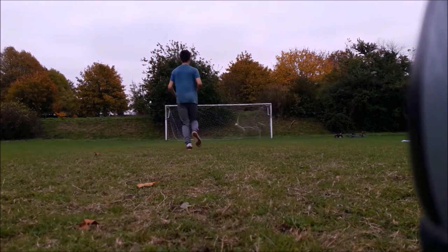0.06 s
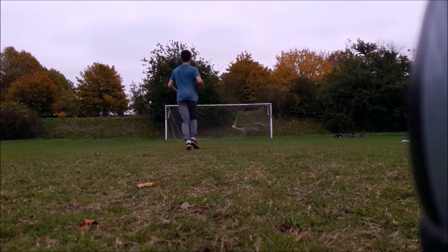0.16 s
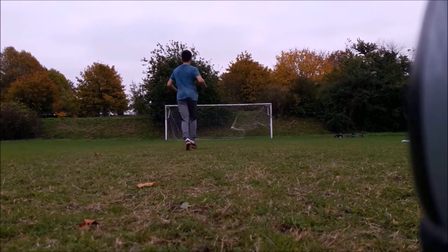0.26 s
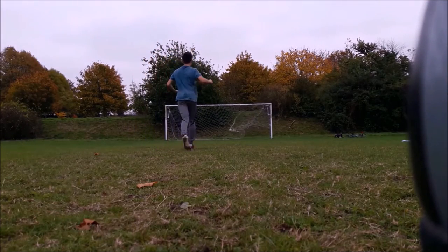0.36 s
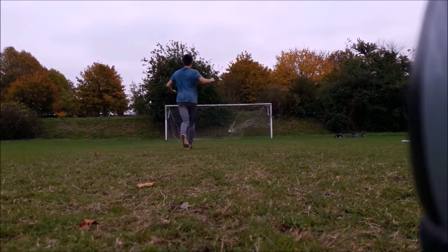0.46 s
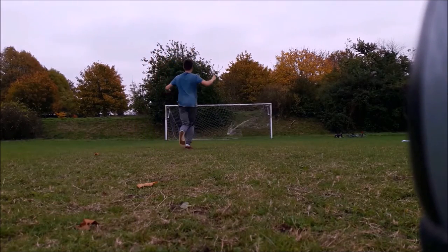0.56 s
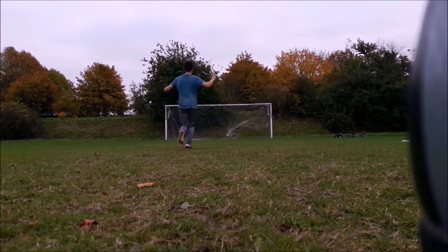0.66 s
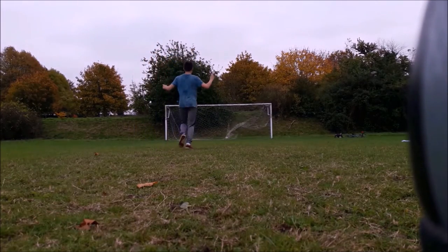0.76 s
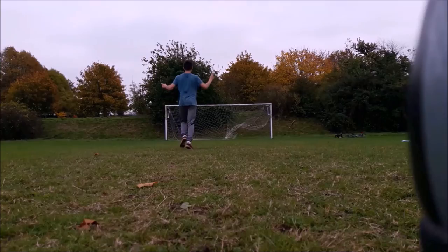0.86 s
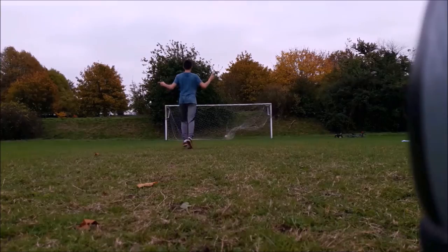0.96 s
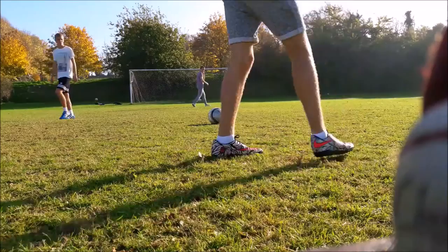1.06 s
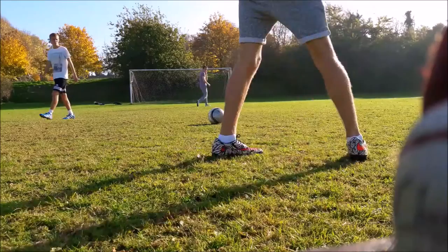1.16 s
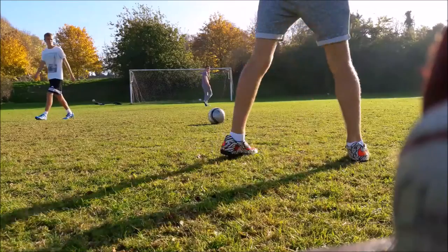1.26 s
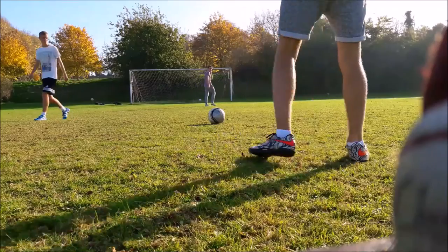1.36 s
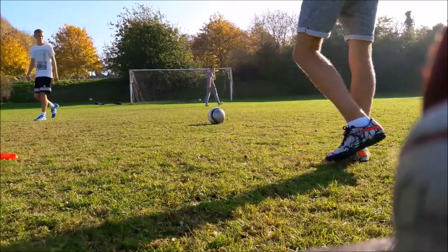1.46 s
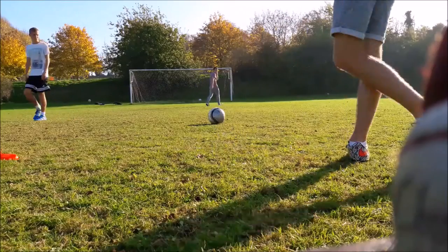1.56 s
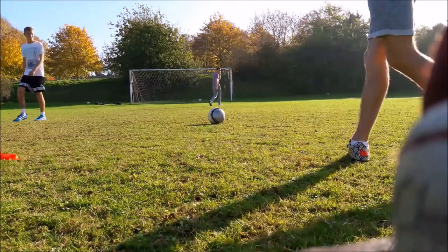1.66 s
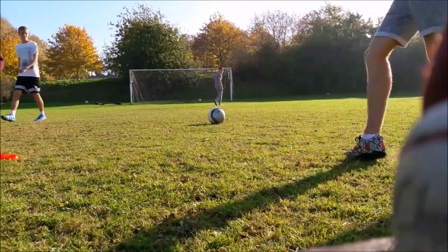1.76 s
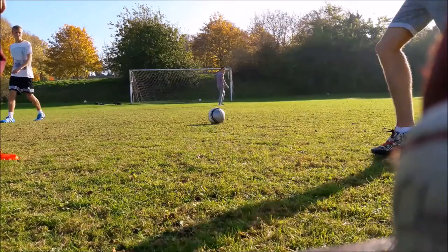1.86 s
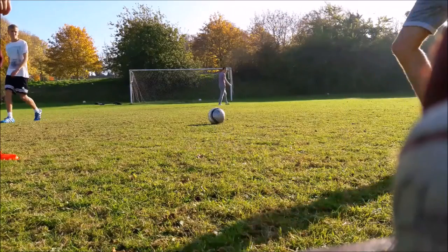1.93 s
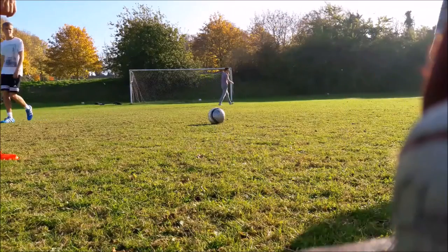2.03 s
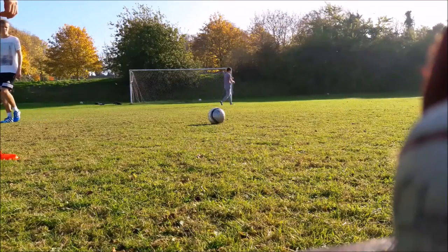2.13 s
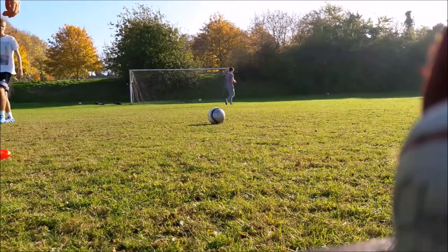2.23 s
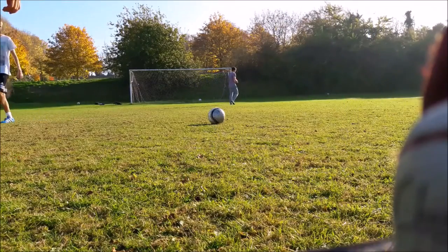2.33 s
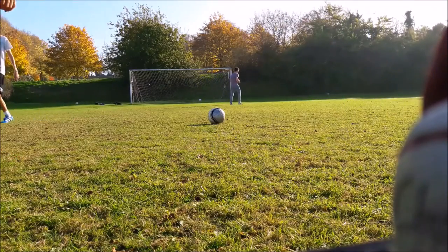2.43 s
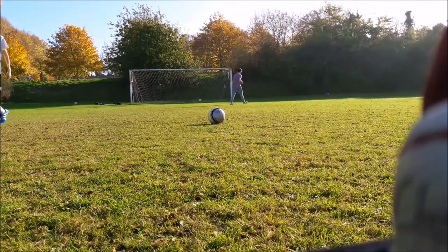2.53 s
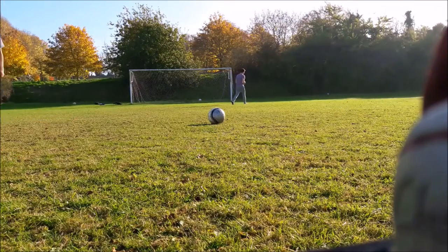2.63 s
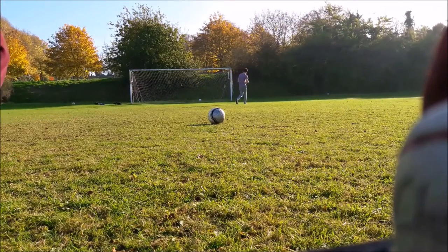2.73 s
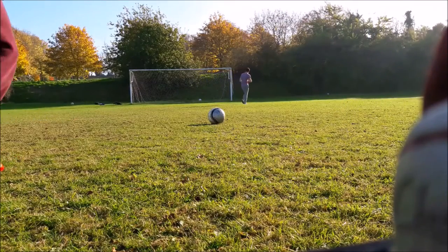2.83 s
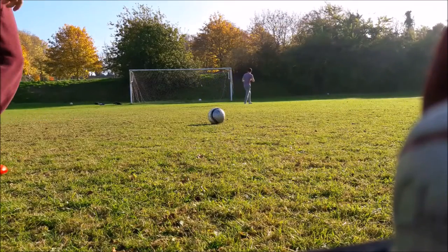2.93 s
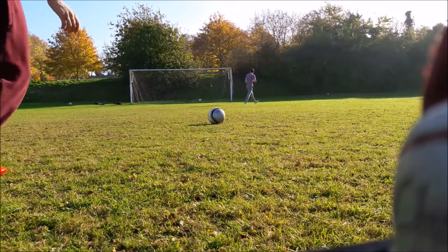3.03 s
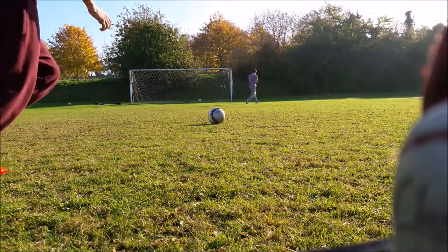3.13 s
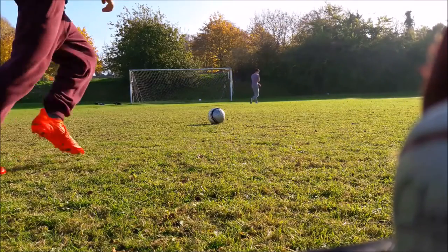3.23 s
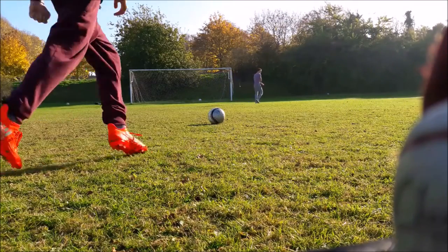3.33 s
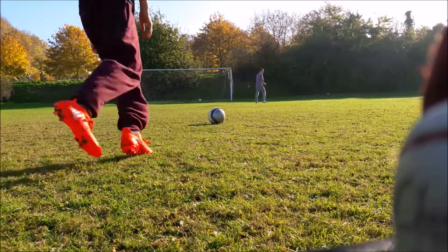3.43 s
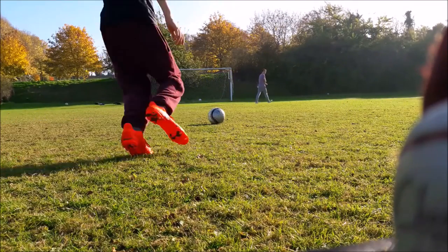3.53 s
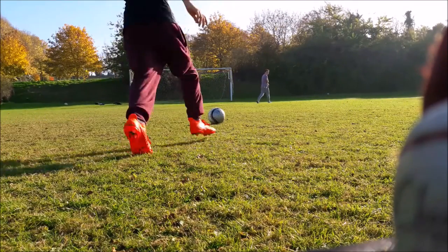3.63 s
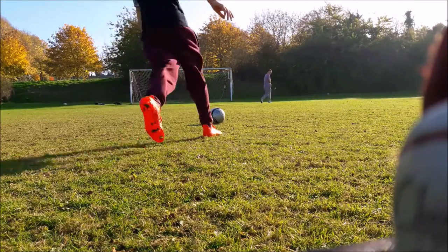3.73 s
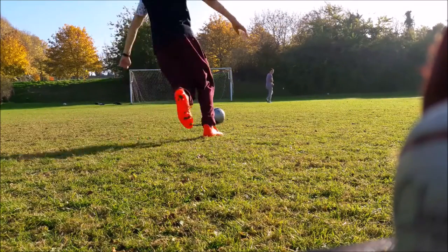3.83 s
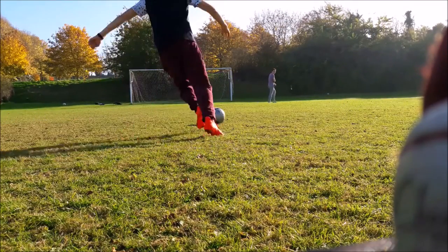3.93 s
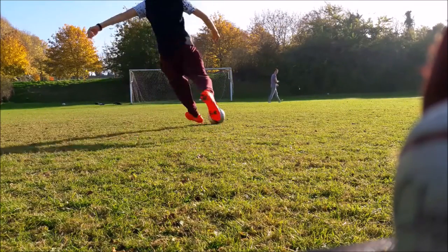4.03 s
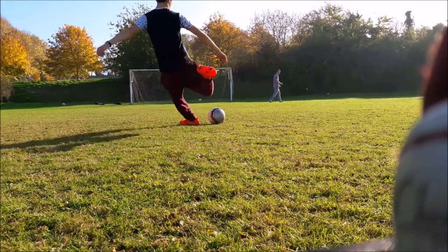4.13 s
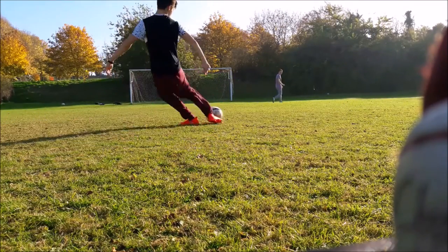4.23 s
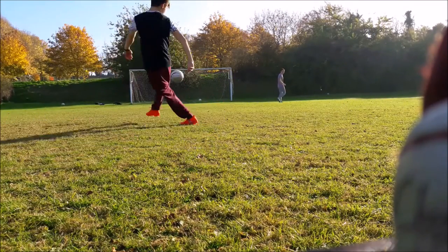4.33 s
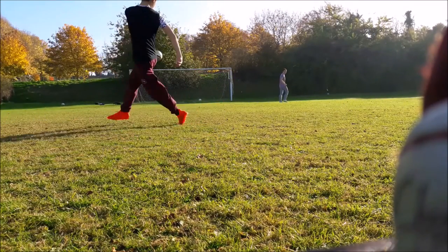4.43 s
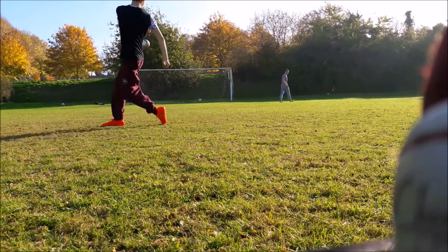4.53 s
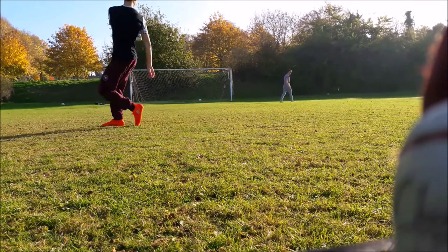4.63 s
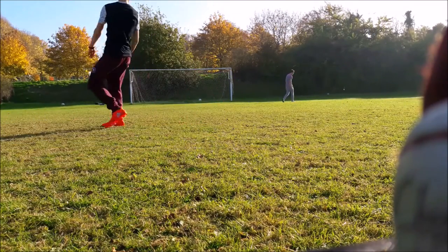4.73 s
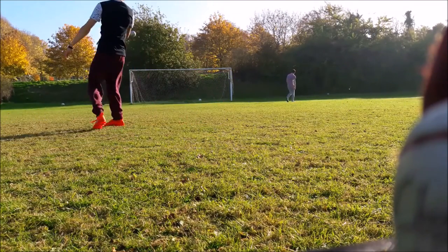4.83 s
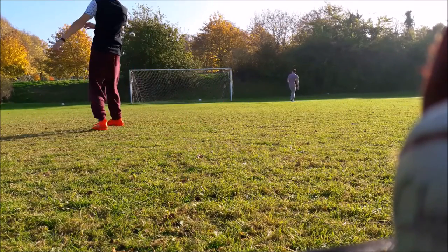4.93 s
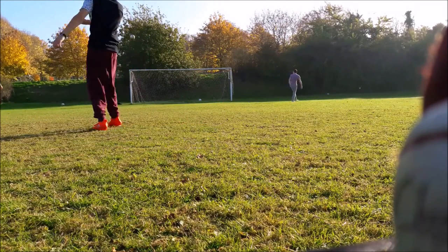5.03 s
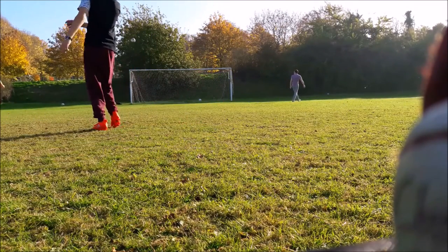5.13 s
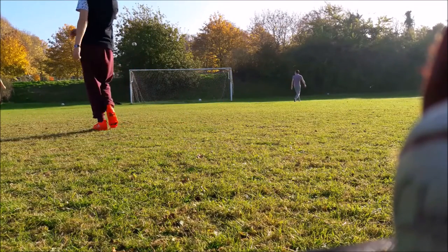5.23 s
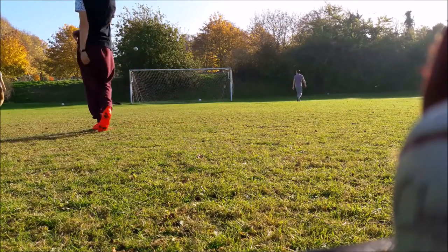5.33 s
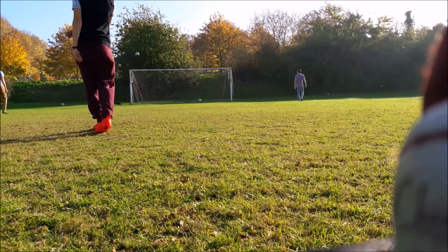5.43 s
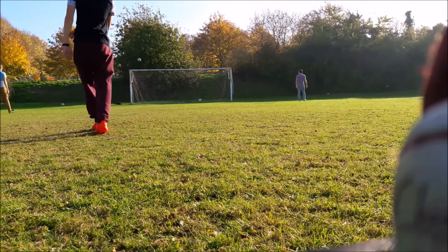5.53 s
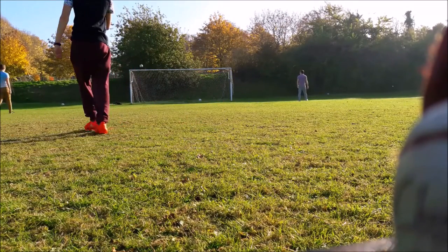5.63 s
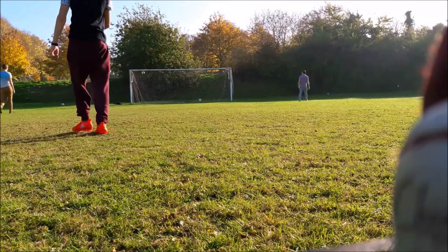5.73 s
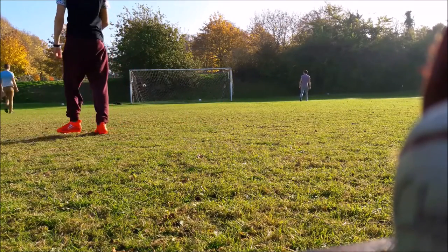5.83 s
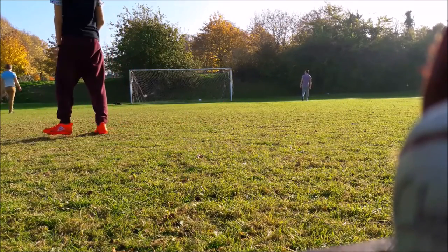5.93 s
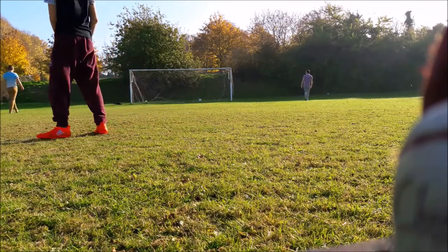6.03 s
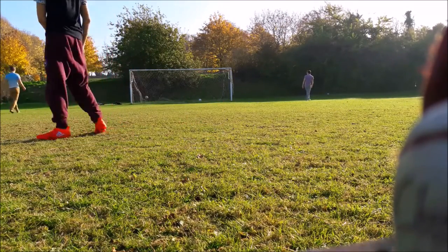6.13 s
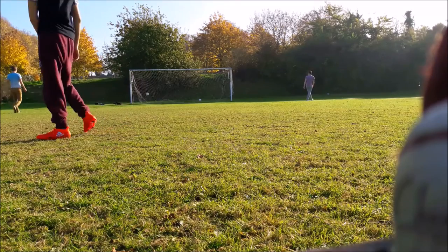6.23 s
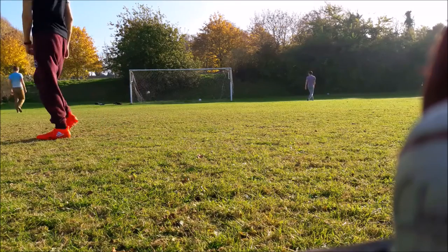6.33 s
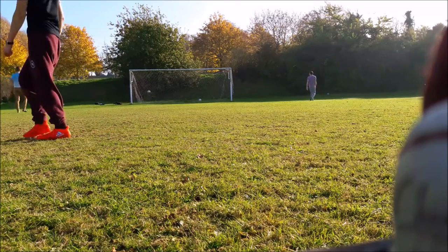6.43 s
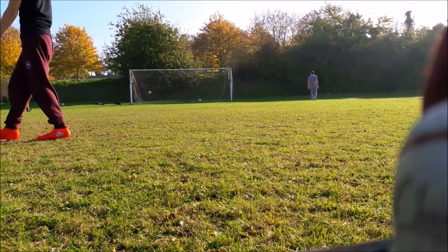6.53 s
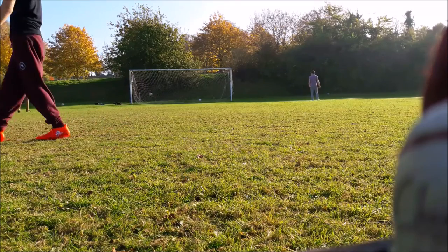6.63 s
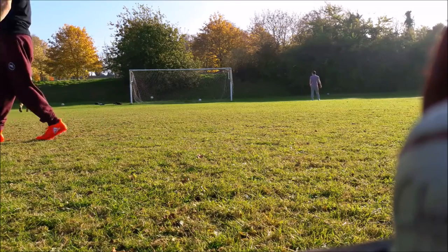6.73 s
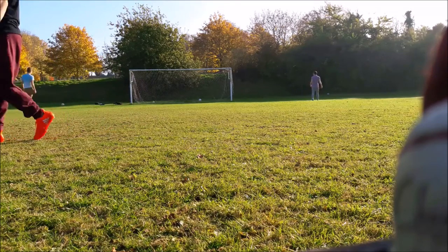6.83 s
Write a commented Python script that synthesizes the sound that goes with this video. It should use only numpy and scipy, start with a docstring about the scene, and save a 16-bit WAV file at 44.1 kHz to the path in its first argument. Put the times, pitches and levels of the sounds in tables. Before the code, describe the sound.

On an open grass pitch, light wind touches the microphone and a far goal frame rattles faintly. The sound changes abruptly to a propeller plane droning overhead, with soft footsteps crunching the grass. A small bird gives three faint whistles during a short run-up. A boot strikes the football with a sharp, loud thud, and a moment later the ball crashes more quietly into a wire fence, leaving loose wires ticking.

```python
"""A grass football pitch in two shots, on a stereo microphone. First, light wind buffets the microphone
and a far goal frame rattles. After the cut at 1.1 s a propeller plane drones overhead while players walk
and run, brushing and snapping the grass. From 3.6 s a small bird whistles three times. At 4.35 s a boot
strikes the ball hard, ringing its skin and the air inside; at 5.9 s the ball crashes into the wire fence
behind the goal, and loose wires tick."""
import sys
import numpy as np
from scipy import signal
from scipy.fft import rfft, irfft, next_fast_len
from scipy.io import wavfile
from scipy.ndimage import uniform_filter1d

SR = 44100
rng = np.random.default_rng(int(sys.argv[2]) if len(sys.argv) > 2 else 0)


def to_wav(s):
    """Save 16-bit WAV."""
    ch = np.atleast_2d(s).T  # columns
    pcm = np.round(np.clip(ch, -1, 1) * 32767)  # PCM
    wavfile.write(sys.argv[1], SR, pcm.astype(np.int16))


N = 303408
CUT_S, HOP = 1.107, 128
HZ, T = np.fft.rfftfreq(4 * HOP, 1 / SR), np.arange(N // HOP + 4) * HOP / SR  # noise bins and frames

# The ball's skin under the boot. Each row: pitch in Hz, level in dB, t60 in seconds.
SKIN_MODES = [(301.5, -4, 0.039), (522, -8, 0.022), (684, 4.5, 0.017), (884, -5, 0.018),
              (1100, -12.5, 0.027), (1285, -6.5, 0.021), (1730, -16.5, 0.027)]
# The boot's first slap. Each row: frequency in Hz, level in dB.
SLAP_SPECTRUM = [(1180, -31), (2000, -16), (2750, -11), (4460, 3.5), (5800, -6), (7620, -8), (8550, -14),
                 (9340, -4), (12600, -11), (16400, -16)]
# Air inside the flying ball. Each row: pitch in Hz, level in dB, t60 in seconds, beat in Hz.
CAVITY_MODES = [(1690, -73, 0.22, 21), (2153, -61, 0.53, 30), (2780, -59.5, .9, 2.5),
                (3451, -58.5, 0.61, 8.7), (4060, -50, 0.17, 14), (4640, -49, .15, 15), (5200, -60, .1, 10)]
def kick(start_s=4.3519, contact_s=.0132, squash_hz=110, free_t60=.022):
    """The boot rings the skin as it lands and lets go, squashes the ball and leaves its air ringing."""
    out, t = np.zeros(N), np.arange(round(.06 * SR)) / SR
    skin = -amp(-11) * uniform_filter1d(ring(SKIN_MODES, .1), size=8, mode="constant")
    add(out, start_s, skin)
    release = signal.convolve(skin, signal.windows.hann(41) / 20)  # letting go is slower
    add(out, start_s + contact_s - .0005, amp(-9.5) * release)
    # the squash lasts while the boot presses and dies fast once the ball is free
    held = (1 - np.exp(-t / .00046)) * amp(-60 * np.maximum(t - contact_s - .003, 0) / free_t60)
    add(out, start_s, amp(-13.5) * held * np.cos(2 * np.pi * squash_hz * (t - .0008)))
    slap_gain = amp(at_hz(SLAP_SPECTRUM, np.fft.rfftfreq(len(t), 1 / SR)))
    slap = irfft(rfft(rng.standard_normal(len(t))) * slap_gain, len(t))
    add(out, start_s, amp(-22) * evened(slap) * amp(-60 * t / .0079))
    # the spinning ball is not quite round, so each air mode is a close pair that beats
    pairs = [(hz + side * beat / 2, db - 4.5, t60)
             for hz, db, t60, beat in CAVITY_MODES for side in (-1, 1)]
    cavity = ring(pairs, .5)
    add(out, start_s + contact_s, cavity * (1 - np.exp(-np.arange(len(cavity)) / SR / .011)))
    return out


# Wire mesh behind the goal. Each row: pitch in Hz, level in dB, t60 in seconds.
MESH_MODES = [(522, -4, 0.06), (756, -2, 0.04), (920, -7, 0.1), (1720, 0, 0.09), (2030, -2, .09),
              (2420, -3, .09), (2915, -1, 0.17), (2990, 2, 0.19), (3530, 1.5, 0.05), (4720, 2, .075),
              (7030, -1.5, .04), (8750, -10, 0.05), (9560, 1, .022), (11920, -4, .025)]
# Blows on the mesh. Each row: start in seconds, relative level in dB, tilt in dB per octave.
MESH_BLOWS = [(5.908, -41.5, 1.5), (5.922, -49, -5), (5.9404, -45, -5), (5.9568, -38, 0),
              (5.9714, -50, -8.5), (5.9844, -39.5, -4), (6.0114, -45, -4), (6.0294, -52, -8.5)]
def fence(impact_s=5.9093, width_s=.00027, detune=.004):
    """The ball hits the fence; each blow rings another part of the mesh, glancing ones more dully."""
    out = np.zeros(N)
    push = amp(-26) * np.exp(-.5 * (np.arange(-80, 81) / SR / width_s) ** 2)
    add(out, impact_s - 80 / SR, -push)  # the ball flattens
    add(out, impact_s - 80 / SR + .014, push)  # and springs off
    for s, db, tilt in MESH_BLOWS:
        draws = rng.standard_normal((len(MESH_MODES), 2))
        modes = [(hz * (1 + detune * shift), mode_db + 1.5 * boost + tilt * np.log2(hz / 3000), t60)
                 for (hz, mode_db, t60), (boost, shift) in zip(MESH_MODES, draws)]
        add(out, s, amp(db - 10.5) * ring(modes, .2))
    return out


# The loudest ticks in the fence. Each row: start in seconds, level in dB.
WIRE_TICKS = [(6.0207, -38), (6.0304, -43), (6.059, -26), (6.069, -34), (6.0764, -39), (6.0922, -34),
              (6.1274, -42), (6.1334, -37), (6.1454, -40), (6.149, -26), (6.1624, -44)]
# One loose wire. Each row: pitch in Hz, level in dB, t60 in seconds.
WIRE_MODES = [(7930, -1, .015), (9300, -6, .012)]
def loose_wires(tick_hz=8200):
    """Loose wires tick after the crash and ring briefly, with small ticks scattered between."""
    small = zip(rng.uniform(6, 6.18, size=10), rng.normal(-49, 3, size=10))
    ticks = blips([(s, db, tick_hz) for s, db in [*WIRE_TICKS, *small]], cycles=1.05)
    return ticks + amp(-30) * signal.oaconvolve(ticks, ring(WIRE_MODES, .03))[:N]


# Noise around the kick and the crash. Each row: start in seconds, level in dB, low and high edge in Hz,
# rise and t60 in seconds.
NOISE_SPRAYS = [(4.325, -61, 1000, 5000, .02, .5), (4.352, -47, 3000, 7000, 0.0009, 0.058),
                (4.354, -34.5, 700, 2190, 0.00207, 0.11), (4.362, -38, 280, 1100, .006, .22),
                (4.369, -55.5, 3200, 6000, .008, 0.3), (4.51, -60.5, 3000, 6600, 0.02, 0.44),
                (5.908, -40.5, 400, 1100, 0.0022, 0.76), (5.909, -43, 1101, 5450, 0.0018, 0.96),
                (5.91, -54, 5940, 11000, .001, 0.53), (5.955, -46, 400, 3570, 0.003, 0.59),
                (5.96, -45, 480, 1000, .01, .8), (6.02, -55.5, 6460, 10500, 0.023, 0.69),
                (6.15, -59.5, 3820, 5660, 0.034, 1.0)]
def sprays():
    """Noise power of the boot swishing through grass, the kick's tail, the shaken mesh and its echo."""
    power = 0
    for s, db, lo_hz, hi_hz, rise, t60 in NOISE_SPRAYS:
        since = np.maximum(T - s, 0)
        band = shape([(lo_hz * .7, -25), (lo_hz, 0), (hi_hz, -4), (hi_hz * 1.3, -30)])
        power += (band * (1 - np.exp(-since / rise)) * amp(db - 60 * since / t60)) ** 2
    return power


# Snaps and thuds around the pitch. Each row: start in seconds, level in dB, pitch in Hz.
STALK_SNAPS = [(1.02, -56, 2600), (1.37, -44.5, 1840), (1.429, -52, 2500), (1.516, -50, 2688),
               (1.555, -41, 899), (1.569, -43, 1380), (1.695, -51, 5500), (1.757, -45, 901.5),
               (1.82, -47, 1420), (1.874, -44, 1517), (1.939, -45, 1033), (2.05, -46, 3900),
               (2.205, -45, 1113), (2.324, -55, 700), (2.59, -50, 1599), (3.2, -52, 2997),
               (3.481, -39, 1500), (3.532, -40.5, 1200), (3.549, -37.5, 1900), (3.59, -53, 1902),
               (3.967, -47, 1600), (3.998, -49, 1298), (4.011, -47.5, 3996), (4.072, -47, 1800),
               (4.088, -44.5, 1514), (4.233, -39.5, 1775), (4.244, -41, 1666), (4.258, -38, 1000),
               (4.597, -43.5, 699.3), (4.64, -51, 1500), (4.949, -50, 1500), (5.061, -53, 1697),
               (5.792, -58, 600), (6.204, -48, 801.7), (6.635, -49, 750), (6.681, -46, 649)]
LOW_THUDS = [(.03, -44.5, 253), (.19, -48.5, 454), (1.36, -54, 59.96), (1.552, -38.5, 399.7),
             (2.144, -35, 574), (2.63, -41.5, 170), (3.62, -46, 89.9), (3.86, -54, 90), (4.233, -37, 300),
             (4.6, -45, 302.7), (4.73, -47, 150), (5.914, -39, 105), (5.955, -35, 500), (6.205, -36, 98),
             (6.68, -43, 448)]
def snaps_and_thuds():
    """Studs and stalks snap; footfalls and the ball hitting the fence give low thuds."""
    return blips(STALK_SNAPS, cycles=1.43) + blips(LOW_THUDS, cycles=1.1)


# Players shuffling, still while the ball flies. Each row: time in seconds, crunch and swish in dB.
SHUFFLE_LEVELS = [(1.11, -68, -73.5), (2.4, -67, -74), (4.2, -70, -74.5), (4.8, -84, -92), (5.55, -80, -95),
                  (5.9, -71, -77), (6.26, -65, -72.5), (6.88, -68.5, -78)]
# Single scuffs. Each row: peak time and swell in seconds, crunch and swish in dB.
BOOT_SCUFFS = [(1.12, .05, -61, -70), (1.39, 0.32, -58.5, -68), (1.54, .1, -59, -62),
               (1.572, .06, -48, -58), (1.75, 0.11, -59, -62.5), (1.825, .06, -58, -73),
               (1.88, .1, -55, -73), (1.94, .08, -55.5, -67), (2.08, 0.33, -72, -68), (2.2, 0.22, -57, -72),
               (2.611, .12, -52.5, -65), (2.65, .05, -60, -68), (3.1, 0.47, -64, -69),
               (3.495, .07, -50, -72), (3.55, .12, -57.5, -69), (3.79, 0.14, -59, -72),
               (3.86, 0.091, -58, -72), (3.97, .02, -52.5, -76), (4.01, .06, -61, -69),
               (4.09, 0.055, -53.5, -76), (4.24, 0.032, -48, -76), (4.33, 0.11, -61, -67),
               (4.54, .2, -66.5, -69.5), (4.65, 0.17, -59, -84), (4.74, .1, -61.5, -78),
               (4.916, .06, -62, -91), (4.97, .06, -57, -87), (5.35, .05, -68, -92), (5.47, .2, -67, -90),
               (5.54, .03, -64, -85), (6.2, .1, -59, -81), (6.69, .12, -63, -78)]
# The two sounds of grass underfoot. Each row: frequency in Hz, level in dB.
CRUNCH_SPECTRUM = [(400, -36), (700, 7), (1000, 0.5), (1600, 0.5), (2200, -7), (3200, -17.5), (5000, -26)]
SWISH_SPECTRUM = [(1500, -27), (2800, 0), (4500, -3.5), (7000, -7.5), (10000, -9.5), (13000, -3),
                  (15900, -14)]
def brushed_grass(swell_db=24, drop_share=.45):
    """Noise power of boots in grass: each scuff swells, then drops faster; stalks break in clumps."""
    clumps = [evened(amp(1.6 * np.minimum(draw, 4))) for draw in rng.exponential(1, (len(T), 2)).T]
    power = amp(curves(SHUFFLE_LEVELS, T)) ** 2
    for s, swell, *levels_db in BOOT_SCUFFS:
        away = np.maximum(s - T, (T - s) / drop_share) / swell
        power += amp(np.array(levels_db)[:, None] - swell_db * away ** 1.5) ** 2
    crunch = power[0] * (clumps[0] * shape(CRUNCH_SPECTRUM, 900, 2300)) ** 2
    swish = power[1] * (clumps[1] * shape(SWISH_SPECTRUM, 3550, 12100)) ** 2
    return crunch + swish


# The plane overhead. Each row: time in seconds, then harmonics 1 to 3 in dB, which swell apart as the
# ground echo shifts.
DRONE_LEVELS = [(1.12, -44, -50, -49), (1.3, -41.5, -47, -51), (1.95, -39.5, -48, -51),
                (2.3, -39, -53.5, -47.5), (2.55, -38, -58, -49.5), (2.8, -38, -53.5, -53.5),
                (3.25, -38.5, -48.5, -51), (3.55, -41.5, -48.5, -53), (3.8, -45, -51.5, -52),
                (4.1, -50.5, -53.5, -56.5), (4.5, -55, -63.5, -55.5), (4.9, -46, -54, -63),
                (5.2, -45, -51.5, -61), (5.7, -41, -55.5, -52.5), (6, -40, -65, -54),
                (6.35, -40.5, -57, -53), (6.7, -42, -54.5, -50.5), (6.87, -41, -59, -49)]
# Exhaust half orders. Each row: multiple of the blade rate, dB against the third harmonic.
EXHAUST_ORDERS = [(2.5, -11.5), (3.5, -20.5), (4.5, -21.5)]
# Upper harmonics. Each row: multiple, dB against the roar, peak time in seconds, fade in dB per second.
UPPER_HARMONICS = [(4, -4.5, 2.3, .5), (5, -7, 2.5, 3), (6, -13.5, 3.4, 4), (7, -21.5, 3.9, 4)]
def propeller(blade_hz=116.96, sag_hz_per_s=.62):
    """Blade and exhaust tones sink in pitch as the plane passes, fluttering in the moving air."""
    t = np.arange(N) / SR
    phase = 2 * np.pi * np.cumsum(blade_hz - sag_hz_per_s * (t - CUT_S)) / SR
    first, second, third = curves(DRONE_LEVELS, t)
    roar_db = curves(ROAR_LEVELS, t)[0]
    throb = np.cos(phase / 6)  # one engine cycle in six blade pulses
    throb_db = 1 + .4 * (t - CUT_S)
    orders = [(1, first), (2, second), (3, third + throb_db * throb)]
    orders += [(k, third + db) for k, db in EXHAUST_ORDERS]
    orders += [(k, roar_db + db - fade * abs(t - s) + 3 * throb) for k, db, s, fade in UPPER_HARMONICS]
    out = 0
    for k, db in orders:
        drift = uniform_filter1d(rng.standard_normal((2, N)), size=2500)
        flutter, wobble = evened(uniform_filter1d(drift, size=2500))
        out += amp(db + .2 * k * flutter) * np.sqrt(2) * np.sin(k * phase + .025 * k * wobble)
    return out


# The plane's roar from the ground. Each row: frequency in Hz, level in dB.
ROAR_SPECTRUM = [(40, -17), (90, 3), (170, -6), (300, -0.5), (450, 0.5), (700, -8), (1000, -13),
                 (1600, -29.5), (3000, -30), (5000, -63)]
# Its swells. Each row: time in seconds, level in dB.
ROAR_LEVELS = [(1.11, -53), (2, -56), (2.86, -56), (3.23, -53.5), (3.66, -56), (4.2, -52), (4.72, -58.5),
               (5.5, -59), (6.06, -53), (6.43, -54.5), (6.88, -52.5)]
def plane_roar():
    """Noise power of the low roar under the plane's tones."""
    return (amp(curves(ROAR_LEVELS, T)[0]) * shape(ROAR_SPECTRUM, 380, 1000)) ** 2


# A small bird, faint at the microphone. Each row: start and length in seconds, top in Hz, level in dB.
BIRD_NOTES = [(3.642, .15, 6800, -71.5), (3.82, .11, 6780, -67), (3.965, 0.1, 6750, -69)]
def bird(slide_s=.025, slide_hz=520, sag_hz_per_s=4500, hold_share=.7, trail_db=-26):
    """Three thin whistles slide up, sag and trail off, with faint echoes from the trees."""
    out = np.zeros(N)
    for s, length, top_hz, db in BIRD_NOTES:
        t = np.arange(0, length, 1 / SR)
        slide = np.minimum(t / slide_s, 1)
        sag = sag_hz_per_s * np.clip(t - slide_s, 0, hold_share * length)
        hz = top_hz - slide_hz * (1 - slide) ** 2 - sag
        trail = np.clip((t / length - hold_share) / (1 - hold_share), 0, 1)
        envelope = amp(db + trail_db * np.sqrt(trail)) * slide * signal.windows.tukey(len(t), .15)
        note = envelope * np.sqrt(2) * np.sin(2 * np.pi * np.cumsum(hz) / SR)
        for delay, echo_db in [(0, 1), (.013, -9), (.034, -10)]:
            add(out, s + delay, amp(echo_db) * note)
    return out


# The goal frame, far from the microphone. Each row: pitch in Hz, level in dB, t60 in seconds.
GOAL_MODES = [(1503, -.5, 0.13), (1884, -3, .1), (2425, 0, 0.084), (2630, -1, 0.081), (3428, -1, 0.082),
              (3830, -13, 0.099), (4330, -3, 0.054)]
# Tugs of the net. Each row: peak time in seconds, level in dB.
GOAL_JOLTS = [(0, -67), (.1, -72), (.2, -67.5), (.31, -65.5), (.52, -79), (.63, -80)]
def goal_frame(knocks_per_s=400, rise_db_per_s=500, fall_db_per_s=106):
    """Jolted by the net, the frame rings with tiny knocks; the net and its hooks blur the ring."""
    knocks = amp(2 * np.minimum(rng.exponential(1, N), 4)) * (rng.random(N) < knocks_per_s / SR)
    ringing = evened(signal.oaconvolve(knocks, ring(GOAL_MODES, .4))[:N])
    band = signal.butter(2, [450, 4500], "band", fs=SR, output="sos")
    clatter = amp(-1.5) * evened(signal.sosfilt(band, rng.standard_normal(N)))
    power = sum(amp(db - np.maximum(fall_db_per_s * (T - s), rise_db_per_s * (s - T))) ** 2
                for s, db in GOAL_JOLTS)
    envelope = np.interp(np.arange(N) / SR, T, np.sqrt(power))
    return (ringing + clatter) * envelope * amp([[1], [-1]])  # a little to the left


# Open air over the pitch in the first shot. Each row: frequency in Hz, level in dB.
AIR_SPECTRUM = [(88, -30), (150, 4.5), (806, -7), (1030, -12.5), (1390, -12.5), (1520, -15), (1610, -14.5),
                (2330, -18.5), (2930, -25), (3380, -28), (10300, -24.5), (13400, -48), (22000, -120)]
# Wind on the microphone. Each row: time in seconds, level in dB.
WIND_LEVELS = [(0, -52), (.12, -54), (.2, -51), (.35, -55), (.6, -55), (.85, -55), (1.1, -55)]
# Their stereo image. Each row: frequency in Hz, then likeness of the sides or left over right in dB.
AIR_LIKENESS = [(60, 0.76), (180, 0.57), (550, -0.29), (1650, -0.3), (4970, -0.46), (15000, 0.35)]
AIR_LEAN = [(60, 4.5), (240, 6.2), (950, 4.7), (3770, 5.0), (15000, 4.5)]
def light_wind():
    """Steady air with low lumps of wind on the microphone ports."""
    rumble = shape([(15, 1.5), (60, 8), (130, -9), (250, -18), (500, -13.5), (800, -47.5)])
    gain = amp(-57.5) * shape(AIR_SPECTRUM) + amp(curves(WIND_LEVELS, T)[0]) * rumble
    return stereo_noise(gain, AIR_LIKENESS, AIR_LEAN, lead=[(0, 0), (SR, 0)], patchy_db=.7)


# The microphone's own hiss. Each row: frequency in Hz, level in dB.
HISS_SPECTRUM = [(880, -25.5), (1500, 0.5), (2040, -3.5), (2180, -9), (4760, -15), (5980, -20), (9610, -20),
                 (10500, -17), (12500, -13), (15900, -13)]
# Stereo image of the second shot's noise. Each row: frequency in Hz, then, by table, likeness of the
# sides, left over right in dB, or left's lead in radians.
FIELD_LIKENESS = [(60, 0.91), (150, 0.9), (380, 1), (950, 0.84), (2380, 0.098), (5980, 0.22), (15000, 0.24)]
FIELD_LEAN = [(60, 0.0), (150, 0.42), (380, 0.0), (950, 0.65), (2380, 1.7), (5980, 0.84), (15000, 1.4)]
FIELD_LEAD = [(0, 1.5), (860, -1), (3360, -2.5), (13300, -3.0), (15300, -2), (16200, 3)]
def field_noise(power, top_hz=15850):
    """Sounds a noise power at the microphone, along with its hiss, and trims the deep bass."""
    hiss = amp(-70.5) * shape(HISS_SPECTRUM, 2640, 20300)
    gain = np.sqrt(power + hiss ** 2) * (HZ < top_hz)[:, None]
    return low_cut(stereo_noise(gain, FIELD_LIKENESS, FIELD_LEAN, FIELD_LEAD, patchy_db=1.5))


# Sources out on the pitch. Each row: frequency in Hz, then left over right in dB or its lead in radians.
SOURCE_LEAN = [(60, .1), (150, .3), (300, 1), (600, 1.2), (1200, 3.5), (4000, 4.5), (8000, 8), (15000, 7)]
SOURCE_LEAD = [(100, 0.094), (520, 0.14), (950, 0.45), (1890, 1.5), (3100, 1.75), (5500, 1.76),
               (16000, 1.9)]
def microphone(x):
    """One source at the two ports: the right one hears it later and duller."""
    size = next_fast_len(N)
    hz = np.fft.rfftfreq(size, 1 / SR)
    left = amp(at_hz(SOURCE_LEAN, hz) / 2)
    right = np.exp(-1j * at_hz(SOURCE_LEAD, hz)) / left
    return irfft(rfft(x, size) * np.array([left, right]), size)[:, :N]


def low_cut(x, cut_hz=62):
    """Trims deep bass from the background noise and the fence sounds."""
    return signal.sosfilt(signal.butter(3, cut_hz, "high", fs=SR, output="sos"), x)


def stereo_noise(gain, likeness, lean, lead, patchy_db):
    """Patchy noise at the two ports from gains over bins and frames."""
    a, b, c, d, patches = rng.standard_normal((len(T), len(HZ), 5)).T
    patches = evened(uniform_filter1d(uniform_filter1d(patches, size=6, axis=0), size=16, axis=1))
    likeness, lean, lead = (at_hz(points, HZ)[:, None] for points in (likeness, lean, lead))
    left, unrelated = a + 1j * b, c + 1j * d
    right = likeness * left * np.exp(-1j * lead) + np.sqrt(1 - likeness ** 2) * unrelated
    spectra = np.array([left * amp(lean / 2), right * amp(-lean / 2)]) * gain * amp(patchy_db * patches)
    return signal.istft(spectra, nperseg=4 * HOP, noverlap=3 * HOP)[1][:, :N] * np.sqrt(3 / 4)


def ring(modes, seconds):
    """Sum of dying sines."""
    t = np.arange(round(seconds * SR)) / SR
    return sum(amp(db - 60 * t / t60) * np.sin(2 * np.pi * hz * t) for hz, db, t60 in modes)


def blips(rows, cycles):
    """Short rounded bursts of a few cycles."""
    out = np.zeros(N)
    for s, db, hz in rows:
        age = np.arange(round(8 * cycles * SR / hz)) * hz / SR / cycles
        envelope = 2 * age * np.exp(1 - 2 * age)
        add(out, s, -amp(db) * envelope * np.sin(2 * np.pi * cycles * age))
    return out


def amp(db):
    """Gain of a level in dB."""
    return 10 ** (np.asarray(db) / 20)


def evened(x):
    """Scaled to rms 1."""
    return x / np.sqrt(np.mean(np.abs(x) ** 2) + 1e-20)


def at_hz(points, hz):
    """Points joined on a log-frequency axis."""
    knots, values = np.transpose(points)
    return np.interp(np.log(hz + 1), np.log(knots + 1), values)


def curves(rows, t):
    """Every column of a table at the times t."""
    s, *columns = np.transpose(rows)
    return [np.interp(t, s, column) for column in columns]


def shape(points, lo_hz=0, hi_hz=SR):
    """Bin gains of a spectrum with unit power between lo_hz and hi_hz."""
    gain = amp(at_hz(points, HZ))
    return gain[:, None] / np.sqrt(np.sum(gain[(HZ >= lo_hz) & (HZ <= hi_hz)] ** 2))


def add(mix, s, sound):
    """Adds a sound at time s."""
    part = mix[round(s * SR):][:len(sound)]
    part += sound[:len(part)]


def scene(calm_top_hz=10150, fade_s=.0048):
    """The calm, duller shot is cut to the second one, which fades in fast."""
    t = np.arange(N) / SR
    lowpass = signal.firwin(255, calm_top_hz, fs=SR)[None]
    calm = signal.oaconvolve(light_wind() + goal_frame(), lowpass, "same")
    busy = field_noise(sprays() + brushed_grass() + plane_roar()) + microphone(propeller())
    events = kick() + low_cut(loose_wires() + fence()) + snaps_and_thuds() + bird()
    fade_in = np.clip((t - CUT_S) / fade_s, 0, 1)
    return (t < CUT_S - .002) * calm + fade_in * busy + microphone(events)


def record(dry):
    """The recorder's band ends at 16.5 kHz."""
    return signal.oaconvolve(dry, signal.firwin(511, 16500, window=("kaiser", 9), fs=SR)[None], "same")


dry = scene()
out = record(dry)
to_wav(out)
```